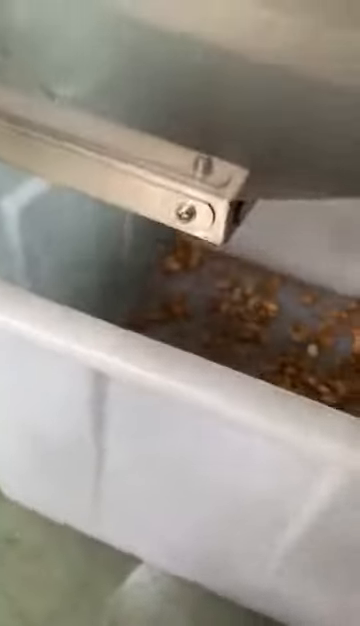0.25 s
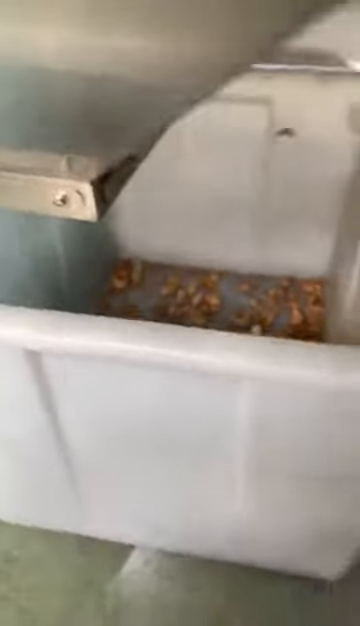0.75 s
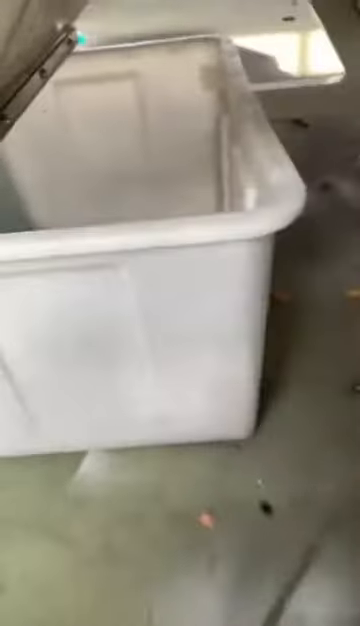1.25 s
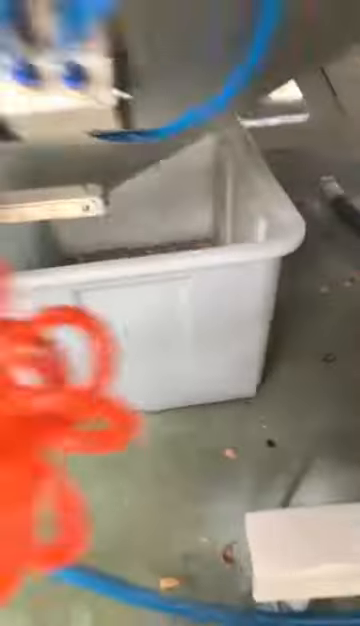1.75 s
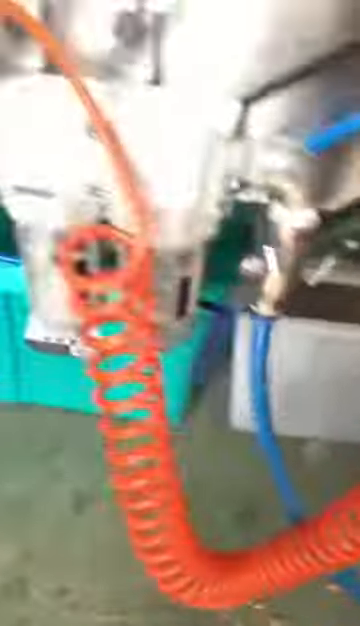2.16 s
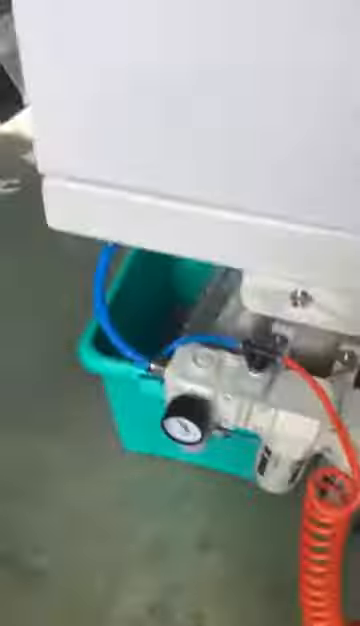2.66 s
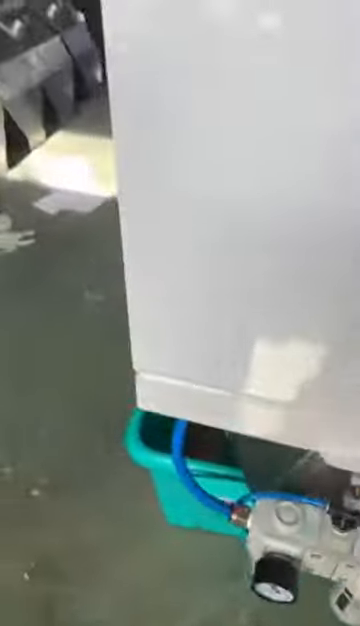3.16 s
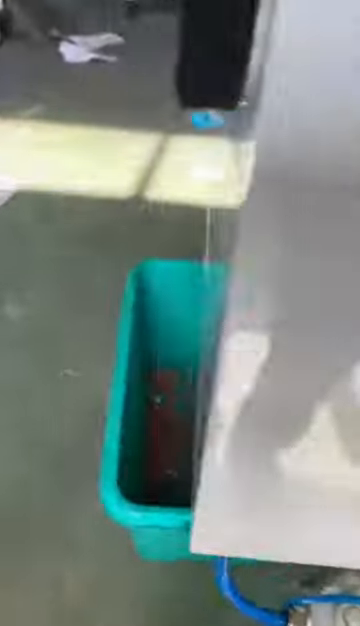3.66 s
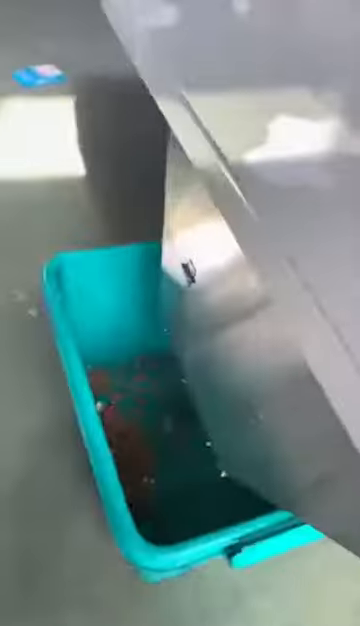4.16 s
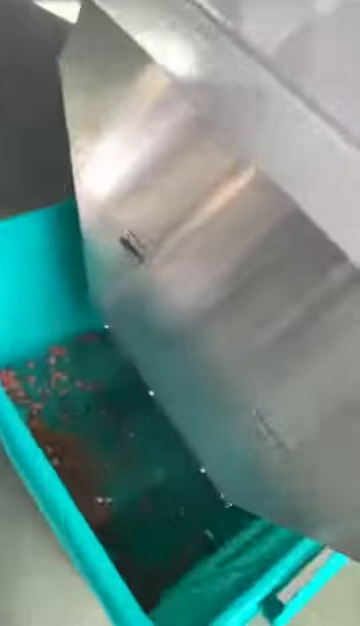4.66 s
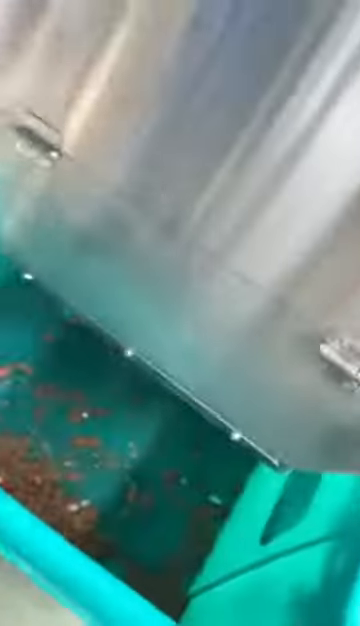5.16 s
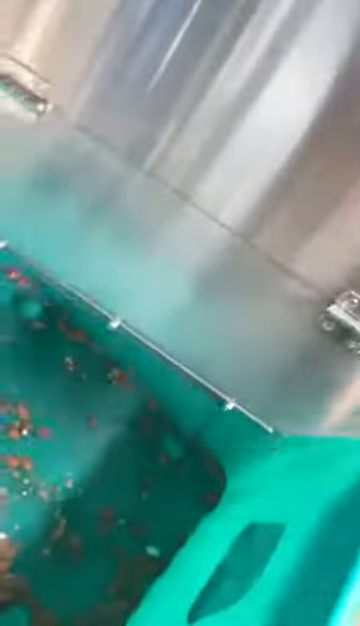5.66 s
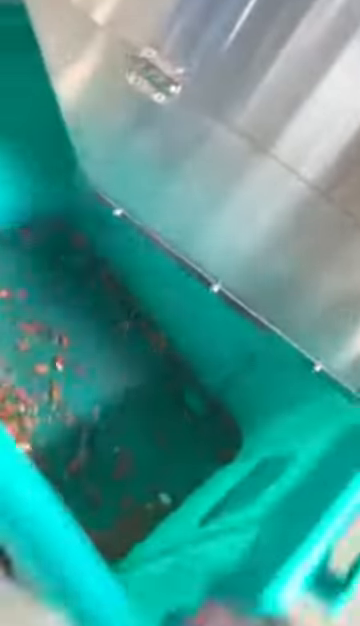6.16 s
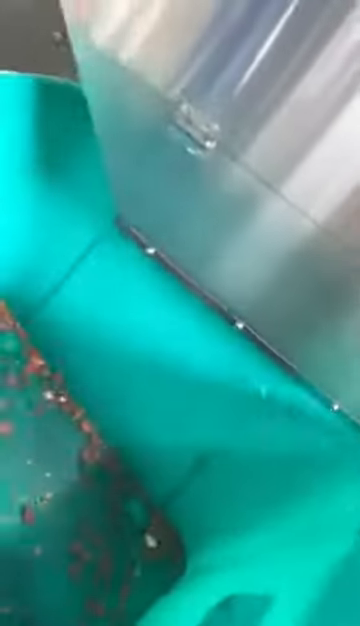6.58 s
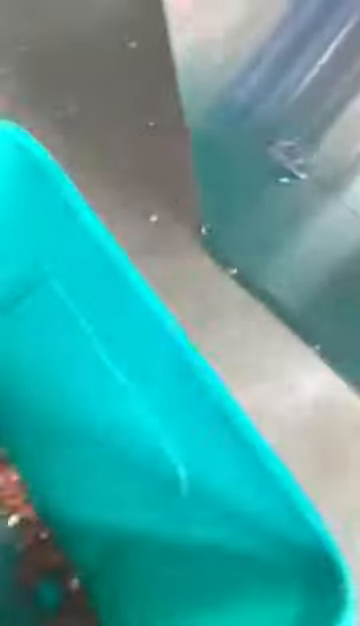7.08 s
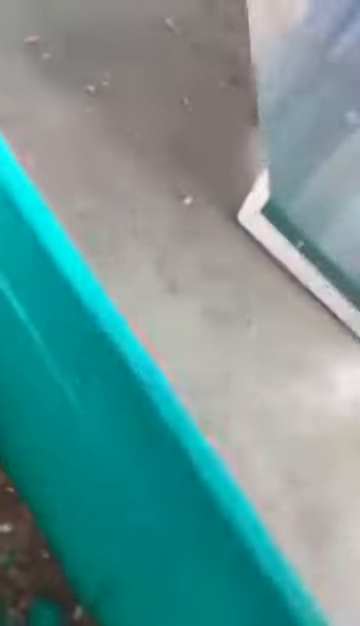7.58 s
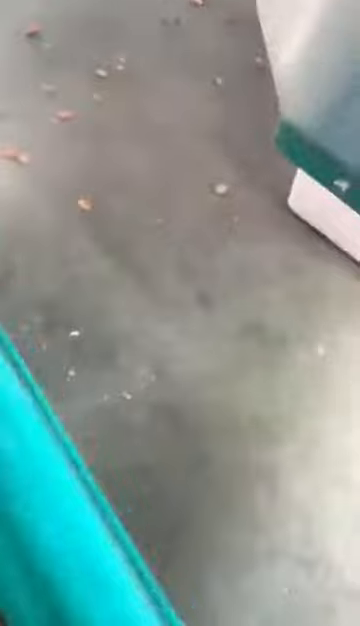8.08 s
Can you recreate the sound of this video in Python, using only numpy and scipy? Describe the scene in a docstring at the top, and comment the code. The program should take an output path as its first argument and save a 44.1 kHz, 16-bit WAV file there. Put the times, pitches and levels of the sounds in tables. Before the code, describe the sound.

A nut sorting machine runs throughout in a hall, with a low rumble, a motor hum and a dense patter of nuts on steel chutes, heard from a microphone moving around it. For the first second or so, short air jets spit rapidly, knocking nuts against steel and plastic with sharp clacks, ringing tinks and dull thumps, loudest near 0.4 seconds. These hits continue, lighter and more scattered, until about 5.2 seconds. From 5.4 seconds the patter recedes and a plastic bin is dragged over the concrete floor in several pulls, starting with faint raspy squeaks. From 6 seconds it scrapes harder, catching and juddering, its hollow walls ringing and booming. The loudest jolts come between 7 and 7.5 seconds. The scraping then fades into a thin squeak and a few low bumps, with the machine still running until about 8.3 seconds.

```python
"""In a hall, heard while walking round a nut sorting machine. Its motors rumble and hum, air jets spit
out rejects, and nuts patter down steel chutes into plastic bins, making the steel ring. Then a hand
drags one bin out over the concrete floor: it scrapes, squeaks, catches and jolts, and its hollow
walls ring and boom."""
import sys
import numpy as np
from scipy import signal
from scipy.fft import rfft, irfft
from scipy.io import wavfile
from scipy.ndimage import uniform_filter1d

SR = 44100
rng = np.random.default_rng(int(sys.argv[2]) if len(sys.argv) > 2 else 0)


def log_audio(samples):
    """Write samples as a 16-bit WAV file to the path given in sys.argv[1]."""
    # one column per channel
    frames = np.atleast_2d(samples).T
    # limit to full scale, then quantise
    limited = np.clip(frames, -1, 1)
    pcm = np.round(limited * 32767).astype(np.int16)
    wavfile.write(sys.argv[1], SR, pcm)


N = 367792
RISE_S = .004  # a knock swells to half strength in this time, so it starts this much early

# tone colour of clattering nuts and belt: pitch_hz, level_db
CLATTER_COLOUR = [(200, -17.5), (380, 4.5), (600, -2), (1100, -1.5), (1900, -5), (2600, -9.5),
                  (3500, -26.5), (5000, -27), (8000, -67)]
# tone colour of compressed air: pitch_hz, level_db
AIR_COLOUR = [(1500, -24), (3000, -5.5), (3900, -3.5), (5000, -10), (6000, -9.5), (7000, -6.5), (8000, -14)]


def air_jets(mix):
    """Short jets of air knock rejected nuts against steel and plastic."""
    # start_s, level_db, pitch_hz, hiss_db, fade_s
    rejects = [(0.035, -19.5, 980, -29.5, 0.077), (0.074, -12, 1774, -36, 0.17),
               (0.133, -15, 1440, -32, 0.21), (0.24, -15.5, 980, -31, 0.095),
               (0.338, -5.5, 1727, -18.5, 0.093), (0.363, 0.5, 1760, -24, 0.078),
               (0.429, -8.5, 770, -23, 0.24), (0.503, -14.5, 1020, -34, 0.15),
               (0.588, -10.5, 1400, -29, 0.057), (0.643, -12, 2240, -52, 0.032),
               (0.679, -16, 1090, -27, 0.047), (0.736, -11.5, 1580, -36, 0.21),
               (0.786, -7.5, 1254, -29, 0.058), (0.835, -17.5, 1330, -36, 0.18),
               (0.899, -16, 2550, -19, 0.039), (0.976, -14, 1775, -32.5, 0.1),
               (1.03, -23, 2450, -21.5, 0.095), (1.064, -22, 1440, -26, 0.087),
               (1.1, -22, 800, -27.5, 0.053), (1.145, -16.5, 1900, -29, 0.032),
               (1.277, -17, 1300, -27, 0.27), (1.342, -16, 1884, -29.5, 0.094),
               (1.377, -17.5, 2730, -32.5, 0.17), (1.511, -19, 1730, -26.5, 0.027),
               (1.592, -21.5, 2010, -42, 0.12), (1.762, -18.5, 1220, -34, 0.15),
               (1.812, -12, 1455, -26.5, 0.1), (1.918, -16.5, 1630, -33.5, 0.048),
               (2.036, -14.5, 1810, -48, 0.052), (2.102, -14.5, 1440, -33, 0.06),
               (2.263, -18.5, 1860, -38, 0.072), (2.391, -19, 1610, -52, 0.034),
               (2.548, -17, 1740, -38.5, 0.097), (2.644, -25, 1810, -38, 0.035),
               (2.795, -17.5, 1720, -34, 0.13), (2.896, -22, 1900, -38, 0.14),
               (2.959, -21, 1800, -36.5, 0.24), (3.169, -15, 2380, -39, 0.11),
               (3.249, -20, 2360, -38.5, 0.017), (3.372, -20, 2440, -60, 0.054),
               (3.48, -22.5, 1850, -40, 0.17), (3.528, -17, 750, -40, 0.07), (3.574, -22, 2220, -39, 0.068),
               (3.599, -18, 1276, -44, 0.16), (3.671, -19, 1840, -38, 0.034),
               (3.814, -29, 2370, -33.5, 0.044), (3.852, -38, 1750, -32, 0.07),
               (3.995, -20, 2230, -48, 0.086), (4.052, -27, 2150, -31, 0.014),
               (4.212, -20.5, 1960, -44, 0.21), (4.35, -15, 1883, -29.5, 0.12),
               (4.664, -23, 2070, -36.5, 0.14), (4.773, -16.5, 1980, -58, 0.057),
               (4.909, -21, 2360, -47, 0.1), (4.951, -10.5, 2083, -28.5, 0.055),
               (5.06, -13.5, 856, -38, 0.056), (5.116, -22.5, 1800, -32, 0.14),
               (5.18, -24, 1900, -27.5, 0.084)]
    for start_s, *settings in rejects:
        add(mix, start_s - RISE_S, knock(*settings))


def knock(level_db, pitch_hz, hiss_db, fade_s):
    """One hard hit: a crack at first contact, then a ringing, hissing rattle that the hall answers."""
    t = np.arange(5000) / SR
    since_hit = np.maximum(t - RISE_S, 0)
    since_hold = np.maximum(t - 2 * RISE_S - 0.12 * fade_s, 0)  # it holds a moment before fading
    swell = np.sin(np.pi / 4 * np.minimum(t / RISE_S, 2)) ** 2
    hall_tail = gain_of(-16) * fade(since_hold, 0.22)
    noise = rng.standard_normal((2, len(t)))
    side_rings = sum(ring(noise, hz, 43) for hz in pitch_hz * rng.uniform(0.609, 2.4, size=4))
    clack = tint(noise, CLATTER_COLOUR)
    body = evened(ring(noise, pitch_hz, 90) + gain_of(-5) * side_rings + gain_of(3.5) * clack)
    rattle = gain_of(level_db - 14.5) * body + gain_of(hiss_db) * tint(noise, AIR_COLOUR)
    bounces_per_s, bounce_s = 120, .004
    kicks = (rng.random(len(t)) < bounces_per_s / SR) * rng.exponential(1, len(t))
    bounces = signal.lfilter([1], [1, -np.exp(-1 / (bounce_s * SR))], kicks)
    rattle *= evened(1.1 + bounces + np.exp(-since_hit / bounce_s))
    rattle *= swell * (fade(since_hold, fade_s) + hall_tail)
    crack = sum(sine(ratio * pitch_hz, since_hit) for ratio in (.8, 1, 1.27, 1.75)) / 2
    crack_db = level_db - 11 - 5 * np.log2(fade_s / .05)  # longer rattles have softer cracks
    return rattle + gain_of(crack_db) * crack * fade(since_hit, 0.0086) * [[1], [.6]]


def steel_tinks(mix):
    """A shell snaps against bare steel and sets all the notes of the plate ringing at once."""
    # start_s, level_db, pitch_hz, fade_s
    strikes = [(0.0745, -15, 1740, .02), (0.337, -12, 1270, .025), (.589, -18, 1400, .02),
               (0.6438, -17, 2130, .02), (.6795, -15, 1700, .02), (0.737, -13.5, 1680, .025),
               (0.8255, -11, 1400, .015), (.9755, -16, 1770, .02), (1.0317, -12.5, 2560, .025),
               (1.052, -16, 2000, .02), (1.065, -15, 2400, .02), (1.226, -20, 2240, .012),
               (1.512, -17, 1770, .02), (1.8123, -9, 1460, .025), (2.1, -21, 1500, .02),
               (2.262, -22, 1800, .02), (2.5463, -19, 1800, .02), (2.6444, -22, 1850, .02),
               (2.793, -24, 1770, .02), (3.171, -22, 2380, .02), (3.481, -24, 1900, .025),
               (3.527, -22, 1500, .02), (3.611, -23, 2000, .025), (3.814, -23, 2050, .02),
               (3.5738, -19, 2200, .02), (3.6006, -18, 1310, .02), (3.6715, -16, 1800, .018),
               (3.853, -23, 2000, .02), (3.995, -20, 2180, .02), (4.0542, -19, 2180, .02),
               (4.351, -15.5, 1883, .02), (4.7721, -15.5, 1990, .02), (4.9082, -8.5, 2450, .014),
               (5.038, -21, 1900, .02), (5.072, -21, 1500, .015), (5.1791, -17, 1830, .02)]
    # notes of the steel plate: pitch_ratio, level_db
    plate_notes = [(.78, -8), (1, 0), (1.22, -5), (1.93, -8), (2.45, -11), (3.0, -9)]
    t = np.arange(2000) / SR
    for start_s, level_db, pitch_hz, fade_s in strikes:
        notes = sum(gain_of(db) * sine(ratio * pitch_hz, t) for ratio, db in plate_notes)
        snap = gain_of(-9.5) * np.exp(-t / .002) * tint(rng.standard_normal((2, len(t))), AIR_COLOUR)
        tink = rise(t, 0.0008) * (1.2 * fade(t, fade_s) * notes + snap)
        add(mix, start_s, gain_of(level_db) * tink * [[1], [.3]])


def air_puffs(mix):
    """A valve opens and shuts, letting out a longer, softer swell of air."""
    # start_s, level_db, length_s
    puffs = [(0.316, -27, 0.037), (0.376, -29.5, .06), (0.546, -33, 0.031), (0.875, -31, 0.029),
             (2.0, -31.5, 0.03), (2.834, -35, 0.034), (3.006, -39, 0.028), (3.709, -34.5, 0.033),
             (4.131, -43, 0.042), (4.331, -35, 0.022), (4.51, -33, 0.062), (5.011, -36, 0.052),
             (5.084, -35, 0.035)]
    for start_s, level_db, length_s in puffs:
        noise = rng.standard_normal((2, round(SR * length_s)))
        air = tint(noise, CLATTER_COLOUR) + 1.27 * tint(noise, AIR_COLOUR)
        add(mix, start_s, gain_of(level_db) * air * signal.windows.tukey(noise.shape[1], .7))


def nut_patter(per_s, spread_db, fade_s):
    """Countless nuts land at random; each starts a short burst of noise, and a few are large."""
    sizes = gain_of(spread_db * np.minimum(rng.exponential(1, N), 4))
    landings = sizes * (rng.random(N) < per_s / SR)
    t = np.arange(4000) / SR
    power = signal.oaconvolve(landings ** 2, rise(t, 0.0017) * fade(t, fade_s) ** 2)[:N]
    return evened(np.sqrt(abs(power)) * rng.standard_normal((2, N)))


def chute_pings(per_s, spread_db, fade_s, patches):
    """Each small nut briefly rings one patch of the chute, and each patch has its own pitch."""
    sizes = gain_of(spread_db * np.minimum(rng.exponential(1, N), 3))
    landings = sizes * (rng.random(N) < per_s / SR)
    patch_hit = rng.integers(0, patches, N)
    t, out = np.arange(2500) / SR, np.zeros((2, N))
    for patch, hz in enumerate(np.geomspace(550, 3200, patches)):
        tone = np.sin(2 * np.pi * (hz * t + rng.random((2, 1))))
        ping = rise(t, 0.00073) * fade(t, fade_s) * tone * np.sqrt(hz)
        out += signal.oaconvolve((landings * (patch_hit == patch))[None], ping, axes=1)[:, :N]
    return evened(out)


def bin_scrape(t, texture):
    """Plastic rubs over concrete, growing louder as each pull speeds up and softer as it slows."""
    # start_s, length_s, scrape_db, grit_db, share_spent_speeding_up
    pulls = [(5.405, 0.55, -35, -83, 0.57), (6.027, 0.32, -29, -55, 0.53), (6.324, 0.3, -27, -37, 0.5),
             (6.603, 0.47, -30.5, -37, 0.34), (6.935, 0.33, -21.5, -30, 0.31),
             (7.296, 0.21, -21, -27, 0.38), (7.5, 0.39, -40, -44.5, 0.3)]
    # tone colour of plastic on concrete: pitch_hz, level_db
    scrape_colour = [(180, -49), (300, -8), (444, -9.5), (666, 5), (1080, -2), (1990, -4.5), (3110, -10),
                     (4030, -10.5), (7600, -56)]
    rustle, pings = texture
    rub = rustle + pings + gain_of(3) * rng.standard_normal((2, N))
    scrape = evened(tint(rub, scrape_colour) + gain_of(-4) * evened(bin_walls(rub)))
    grit = tint(rustle, AIR_COLOUR)
    out = np.zeros((2, N))
    for start_s, length_s, scrape_db, grit_db, speeding_up in pulls:
        ramp = np.interp(t, start_s + length_s * np.array([0, speeding_up, 1]), [0, 1, 0])
        speed = np.sin(np.pi / 2 * ramp)
        out += speed * (gain_of(scrape_db) * scrape + gain_of(grit_db) * grit)
    return out


def bin_jolts(mix):
    """The bin catches on the floor: its edge judders, its walls ring and it gives a gritty knock."""
    # start_s, knock_db, pitch_hz, fade_s, wall_db, judder_s
    jolts = [(5.368, -32, 1580, 0.22, -28, .004), (5.468, -22, 1217, 0.17, -20, 0.017),
             (5.781, -31, 1800, 0.14, -30, .01), (5.984, -44, 684, 0.069, -22.5, 0.021),
             (6.034, -42, 1184, .05, -26, .012), (6.068, -21.5, 1163, 0.066, -20, 0.012),
             (6.093, -29, 1233, .06, -21.5, 0.012), (6.1405, -21, 1115, 0.05, -12.5, 0.012),
             (6.2, -12.5, 1700, 0.13, -19, 0.0065), (6.356, -15, 1800, 0.038, -24, 0.0076),
             (6.465, -17, 870, 0.16, -29, 0.0069), (6.501, -14.5, 920, 0.079, -24, 0.0053),
             (6.68, -17.5, 1180, 0.19, -31, 0.0053), (6.781, -24, 1150, 0.08, -29, .005),
             (6.926, -12, 1720, 0.13, -26, 0.0054), (6.981, -10.5, 2090, 0.31, -24, 0.0065),
             (7.009, -2.5, 954, 0.12, -14, 0.0087), (7.021, -13, 1110, 0.071, -26, .006),
             (7.045, -2.5, 720, 0.077, -26, 0.011), (7.07, -9, 1715, 0.092, -16, 0.0053),
             (7.091, -18, 890, 0.11, -19, 0.0043), (7.262, -6, 735, 0.099, -13, 0.011),
             (7.326, -12.5, 865, 0.24, -22, 0.012), (7.376, -21, 720, .06, -17, 0.0083),
             (7.411, -6, 1885, 0.04, -4, .010), (7.454, -13.5, 670, 0.16, -27, 0.005),
             (7.718, -19, 1760, 0.13, -33, 0.0045)]
    t = np.arange(5000) / SR
    for start_s, knock_db, pitch_hz, fade_s, wall_db, judder_s in jolts:
        slip = sine(pitch_hz, t) / 8 + .45 * rng.standard_normal((2, len(t)))
        walls = bin_walls(slip * (t < judder_s), pitch_hz) * [[1], [.25]]
        add(mix, start_s, gain_of(wall_db) * walls / abs(walls).max())
        add(mix, start_s - RISE_S, knock(knock_db, pitch_hz, hiss_db=knock_db - 23.5, fade_s=fade_s))


def bin_walls(push, near_hz=None):
    """The plastic walls ring at their own notes, favouring those close to near_hz if it is given."""
    # pitch_hz, level_db, fade_s
    wall_notes = [(720, 5, 0.03), (1110, 6.5, 0.035), (1461, 3, 0.049), (1890, -2, 0.025),
                  (2240, -4.5, 0.04), (2900, -25.5, 0.034), (4020, -20, .025)]
    out = 0
    for pitch_hz, level_db, fade_s in wall_notes:
        octaves_away = abs(np.log2(pitch_hz / near_hz)) if near_hz else 0
        out += gain_of(level_db - 18 * octaves_away) * ring(push, pitch_hz, 2.2 / fade_s)
    return out


def bin_squeaks(mix):
    """The sliding bin sticks and slips, so its wall sings with a raspy tone."""
    # start_s, length_s, pitch_hz, level_db
    squeaks = [(5.398, 0.23, 1608, -39), (5.461, .08, 1586, -37), (5.658, 0.16, 1223, -31.5),
               (5.641, 0.13, 1605, -35), (5.758, 0.049, 1754, -28.5), (7.468, .34, 1690, -35),
               (7.492, 0.24, 7080, -35), (7.76, 0.66, 1720, -42)]
    for start_s, length_s, pitch_hz, level_db in squeaks:
        swell = signal.windows.tukey(round(length_s * SR), 0.34)
        tone = wavering_tone(pitch_hz, level_db, waver_hz=26, roughness=.8, waver_samples=350)
        add(mix, start_s, tone[:, :len(swell)] * swell)


def bumps(mix):
    """The bin and the machine frame bump: a dull, low ring with the hollow bin's quick boom on top."""
    # start_s, level_db, pitch_hz, fade_s, boom_above_ring_db
    blows = [(0.164, -17, 104, 0.069, 11), (0.351, -16, 113, 0.15, 7), (0.625, -17, 109, 0.093, -4),
             (.75, -7, 95, 0.064, -12), (0.903, -18.5, 106, 0.18, -17), (1.05, -14.5, 88, 0.051, 3),
             (1.273, -30, 92, 0.23, 6), (1.752, -27, 83, 0.22, 1.5), (2.93, -35, 69, 0.078, -12),
             (3.991, -24, 62.5, 0.19, 1), (4.992, -24.5, 90, 0.15, 11.5), (5.786, -21.5, 75, 0.2, 7.5),
             (6.084, -15, 87.5, 0.13, 4), (6.12, -15, 70, 0.1, 5.5), (6.207, -10.5, 67, 0.15, 7),
             (6.385, -21, 91, 0.28, 11), (6.205, -6.5, 240, 0.076, -26), (6.99, 0, 290, 0.089, -33),
             (7.001, -12.5, 63, 0.19, 12), (7.265, -10, 260, 0.12, -28), (7.261, -13.5, 87.4, 0.29, 12.5),
             (7.543, -23, 104.4, 0.31, -10), (7.642, -23.5, 100, 0.55, -15), (7.877, -23, 94.3, 0.98, -10),
             (8.137, -19, 99.7, 0.27, -13)]
    t = np.arange(9000) / SR
    for start_s, level_db, pitch_hz, fade_s, boom_db in blows:
        boom = gain_of(boom_db) * rise(t, 0.0085) * fade(t, 0.13) * sine(180, t)
        thud = rise(t, 0.0052) * fade(t, fade_s) * (sine(pitch_hz, t) + boom)
        add(mix, start_s, gain_of(level_db) * thud * np.ones((2, 1)))


def machine_noise(t, texture):
    """Drives rumble, nuts and belt clatter and air hisses, each louder or softer along the walk."""
    # time_s, rumble_db, clatter_db, hiss_db
    walk_levels = [(0.0, -31, -37, -39.5), (0.88, -35, -34.5, -33), (1.14, -34, -39.5, -34.5),
                   (2.02, -36, -37.5, -35.5), (2.56, -41, -40.5, -43), (3.51, -38, -42.5, -44),
                   (3.79, -40, -37.5, -39), (4.13, -34.5, -37.5, -40), (4.83, -36, -39.5, -41),
                   (5.04, -37.5, -36.5, -34), (5.29, -38, -39.5, -51), (5.57, -40.5, -41.5, -83),
                   (6.08, -33, -35.5, -64), (6.32, -29, -35, -36), (6.76, -34, -37, -79),
                   (7.22, -29, -32, -49), (7.87, -33.5, -35, -49), (8.34, -28.5, -38, -52)]
    # tone colour of the drives: pitch_hz, level_db
    rumble_colour = [(20, -56), (35, -12.5), (55, 0), (110, -4), (200, -9), (300, -6.5), (400, -12),
                     (700, -50)]
    rustle, pings = texture
    rumble_db, clatter_db, hiss_db = curves(walk_levels, t)
    rumble = tint(restless_noise(patchy_db=1.2, speckle_db=0.31, flicker_db=2.5), rumble_colour)
    clatter = tint(rustle + pings, CLATTER_COLOUR)
    hiss = tint(rustle, AIR_COLOUR)
    return gain_of(rumble_db) * rumble + gain_of(clatter_db) * clatter + gain_of(hiss_db) * hiss


def motor_hum(t):
    """The motors hum on two slightly unsteady notes."""
    # time_s, lower_note_db, upper_note_db
    hum_levels = [(0, -50, -32.5), (.8, -52, -32), (1.4, -52, -34), (1.9, -54, -39), (2.4, -54, -48),
                  (2.9, -54, -46), (3.5, -54, -44), (4.2, -48, -45), (5.1, -34.5, -50), (5.8, -33, -51.5),
                  (6.1, -46, -51.5), (8.34, -46, -45)]
    lower_db, upper_db = curves(hum_levels, t)
    lower = wavering_tone(301.5, lower_db, waver_hz=1.63, roughness=1, waver_samples=2000)
    upper = wavering_tone(500.6, upper_db, waver_hz=3, roughness=0.5, waver_samples=1500)
    return lower + upper


def wavering_tone(pitch_hz, level_db, waver_hz, roughness, waver_samples):
    """A tone whose pitch wanders at random while its level trembles three times as fast."""
    slow, quick = rng.standard_normal((2, N))
    cycles = np.cumsum(pitch_hz + waver_hz * smoothed(slow, waver_samples)) / SR
    tremble = 1 + roughness * smoothed(quick, waver_samples // 3)
    return gain_of(level_db) * tremble * np.sin(2 * np.pi * (cycles + rng.random((2, 1))))


def restless_noise(patchy_db, speckle_db, flicker_db):
    """Noise with broad drifting patches, short narrow speckles and a flicker shared by all pitches."""
    frames = N // 256 + 5
    a, b, c, d, patches, speckles = rng.standard_normal((frames, 513, 6)).T
    level_db = patchy_db * smoothed(patches, 16, 10) + speckle_db * smoothed(speckles, 3, 6)
    level_db += flicker_db * smoothed(uniform_filter1d(rng.standard_normal(frames), 4), 4)
    spectra = np.array([a + 1j * b, c + 1j * d]) * gain_of(level_db)
    return evened(signal.istft(spectra, nperseg=1024, noverlap=768)[1][:, :N])


def ring(x, pitch_hz, width_hz):
    """Makes a sound ring at one pitch; a narrower width rings longer."""
    r = np.exp(-np.pi * width_hz / SR)
    return evened(signal.lfilter([1, 0, -1], [1, -2 * r * np.cos(2 * np.pi * pitch_hz / SR), r * r], x))


def tint(x, colour):
    """Gives a sound a tone colour, at a strength of 1."""
    hz = np.fft.rfftfreq(x.shape[1], 1 / SR)
    return evened(irfft(rfft(x) * gain_of(at_pitch(colour, hz)), x.shape[1]))


def smoothed(x, *spans):
    """Blurs random values into slow changes of strength 1, with one span for each axis."""
    for axis, span in enumerate(spans):
        x = uniform_filter1d(x, span, axis=axis)
    return evened(x)


def evened(x):
    """Scales a signal to an average strength (rms) of 1."""
    return x / np.sqrt(np.mean(x ** 2) + 1e-20)


def fade(t, fade_s):
    """Dies away by 60 dB every fade_s seconds."""
    return gain_of(-60 * t / fade_s)


def rise(t, rise_s):
    return 1 - np.exp(-t / rise_s)


def sine(pitch_hz, t):
    return np.sin(2 * np.pi * pitch_hz * t)


def gain_of(db):
    return 10 ** (np.asarray(db) / 20)


def at_pitch(rows, hz):
    pitches, values = np.transpose(rows)
    return np.interp(np.log(hz + 1), np.log(pitches + 1), values)


def curves(rows, t):
    times, *columns = np.transpose(rows)
    return [np.interp(t, times, column) for column in columns]


def add(mix, start_s, sound):
    part = mix[:, round(start_s * SR):][:, :sound.shape[1]]
    part += sound[:, :part.shape[1]]


def scene():
    """Every sound arrives along two paths: row 0 is the direct one, row 1 the scattered one."""
    # how near the falling nuts are: time_s, level_db
    nut_nearness = [(0, 4.5), (5.2, 0), (5.35, -7), (8.34, -10.5)]
    t = np.arange(N) / SR
    nearness = gain_of(curves(nut_nearness, t)[0])
    rustle = restless_noise(patchy_db=1.75, speckle_db=4.76, flicker_db=2.14)
    rustle += nearness * gain_of(-9) * nut_patter(per_s=88, spread_db=1.5, fade_s=0.021)
    pings = nearness * gain_of(-8) * chute_pings(per_s=400, spread_db=3, fade_s=.04, patches=30)
    texture = rustle, pings  # the scrape and the machine share this fine grain
    mix = bin_scrape(t, texture) + machine_noise(t, texture) + motor_hum(t)
    for add_source in (bin_squeaks, air_jets, bin_jolts, steel_tinks, air_puffs, bumps):
        add_source(mix)
    return mix


def record(dry):
    """Two moving microphones: the left hears the direct path, the right a phase-shifted blend of both."""
    # how far the right side's wave runs ahead: pitch_hz, lead_radians
    right_lead = [(40, -0.15), (86, -0.6), (130, -1.1), (215, -2.35), (260, -2.95), (345, -3.35),
                  (450, -4.5), (520, -5.4), (690, -4.2), (1100, -8.5), (1400, -5.5), (2350, -5.5),
                  (2800, -3.5), (3300, -3), (3900, -5.9), (4300, -5.2), (6200, -4), (7600, -5.5)]
    # how alike the two sides are: pitch_hz, likeness_0_to_1
    side_likeness = [(20, 0.95), (240, .91), (300, .895), (380, 0.93), (450, 0.75), (505, .88), (570, .5),
                     (700, 0.21), (1500, 0.5), (1900, 0.89), (2500, 0.5), (2900, 0.67), (3400, 0.75),
                     (3700, 0.15), (4050, 0.7), (4500, 0.3), (6000, 0.056), (7000, 0.94)]
    # balance of the two sides: pitch_hz, left_minus_right_db
    balance = [(100, 0.5), (400, -0.5), (650, -5.5), (1900, -1), (3900, -1), (5000, -6), (5900, -5.5),
               (7300, 1)]
    # turning stretches the lead pattern along the pitches: time_s, stretch_factor
    turning = [(0, 0.92), (1.5, 1.008), (4.2, 1.048), (5.5, 1.154), (5.9, 1), (6.3, 0.99), (6.9, 1.105),
               (7.05, 1.2), (7.6, 1.108), (7.9, 0.95), (8.34, 1)]
    hz, t, (direct, scattered) = signal.stft(dry, SR, nperseg=1024, noverlap=768)
    wander = smoothed(rng.standard_normal((len(t), len(hz))), 12, 16).T
    likeness = at_pitch(side_likeness, hz)[:, None]
    tilt = gain_of(at_pitch(balance, hz) / 2)[:, None]
    shift = at_pitch(right_lead, hz[:, None] / curves(turning, t)[0]) + 2.95 * (1 - likeness) * wander
    direct_share = np.minimum(likeness + 0.13, 1)
    right = (direct_share * direct + np.sqrt(1 - direct_share ** 2) * scattered) * np.exp(1j * shift)
    stereo = signal.istft(np.array([direct * tilt, right / tilt]), nperseg=1024, noverlap=768)[1][:, :N]
    stereo = 1.1 * np.tanh(stereo / 1.1)  # the preamplifier rounds the loudest peaks
    treble_cut = signal.firwin(701, cutoff=7610, window=("kaiser", 9), fs=SR)
    return signal.oaconvolve(stereo, treble_cut[None], "same")


dry = scene()
out = record(dry)
log_audio(out)
```